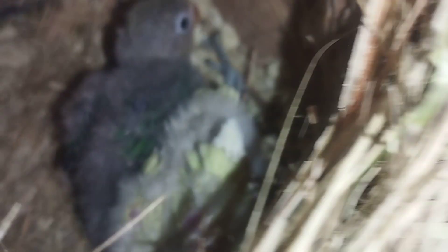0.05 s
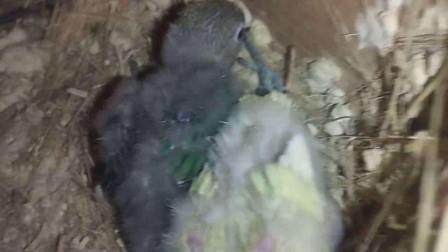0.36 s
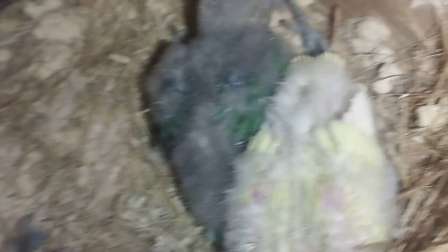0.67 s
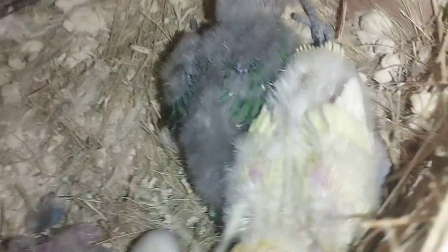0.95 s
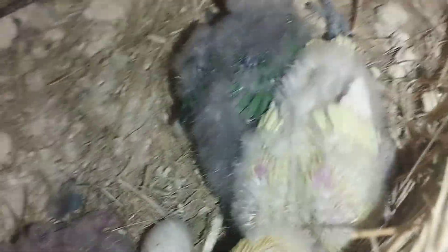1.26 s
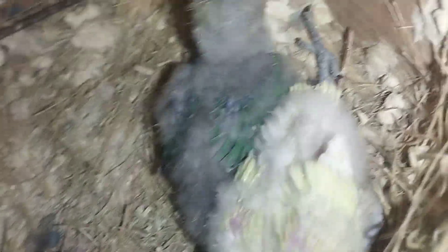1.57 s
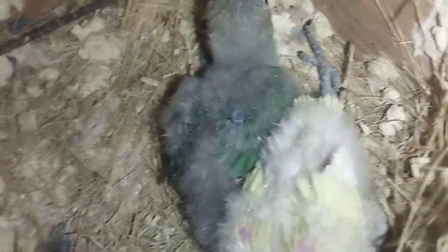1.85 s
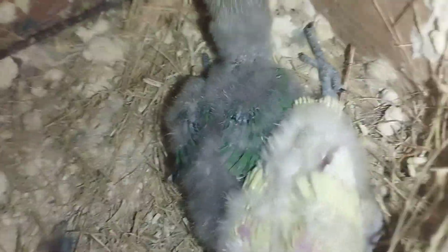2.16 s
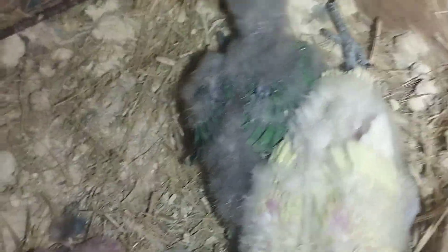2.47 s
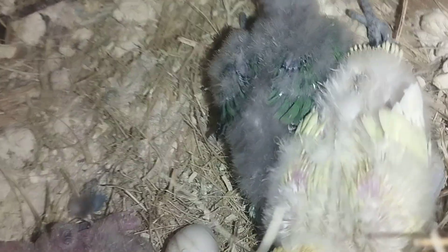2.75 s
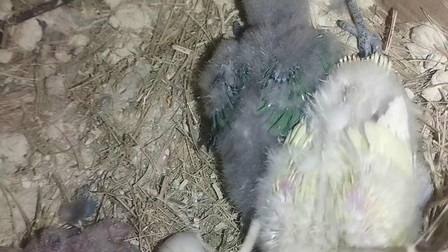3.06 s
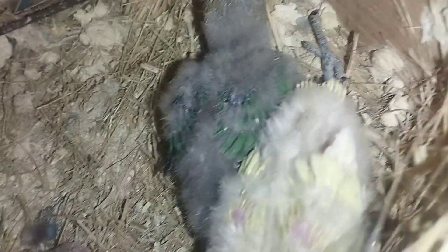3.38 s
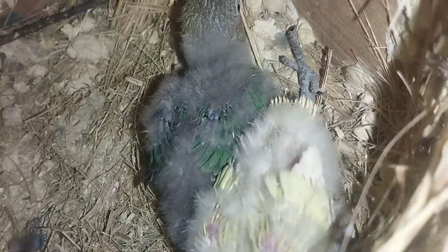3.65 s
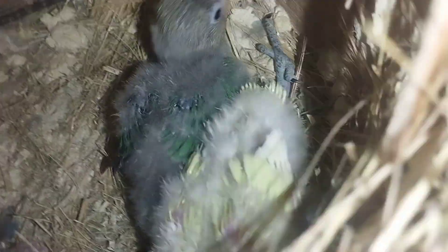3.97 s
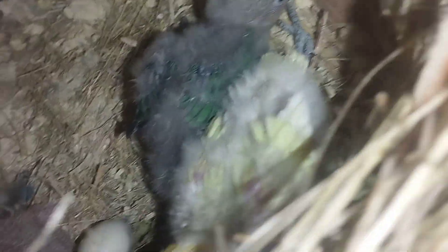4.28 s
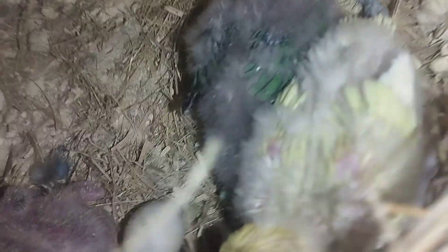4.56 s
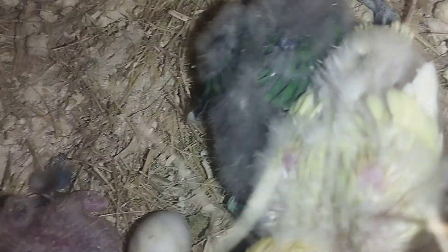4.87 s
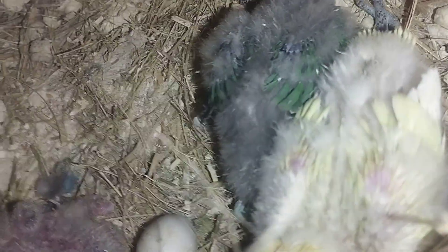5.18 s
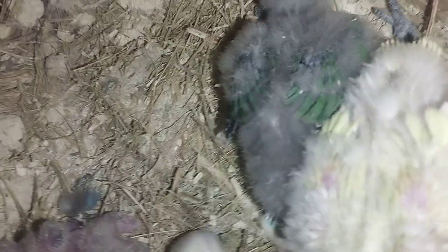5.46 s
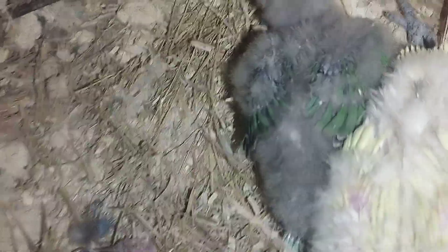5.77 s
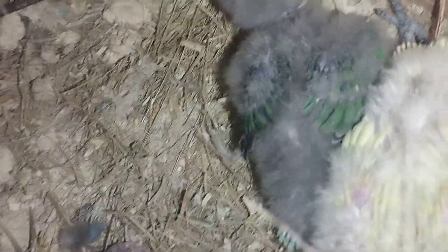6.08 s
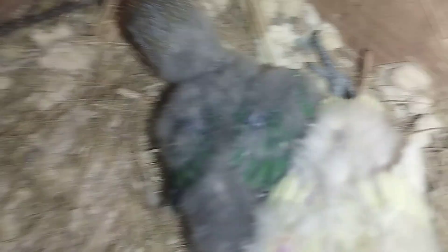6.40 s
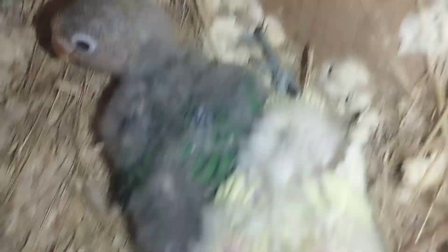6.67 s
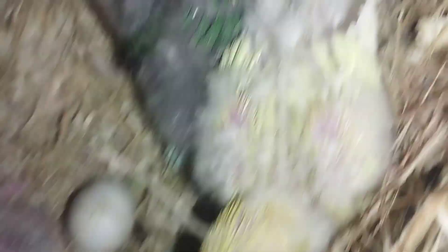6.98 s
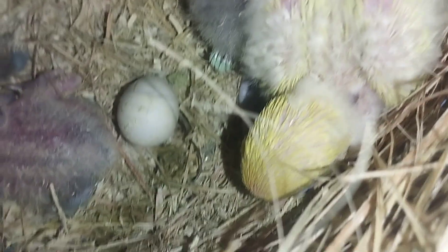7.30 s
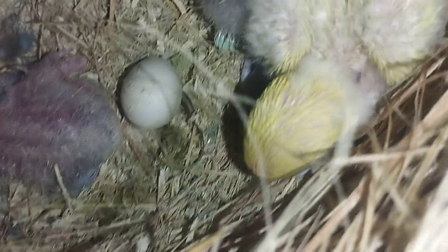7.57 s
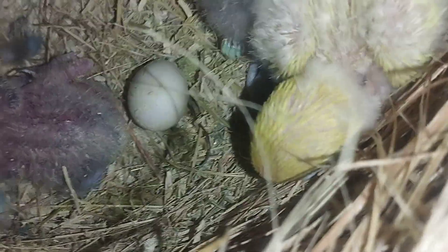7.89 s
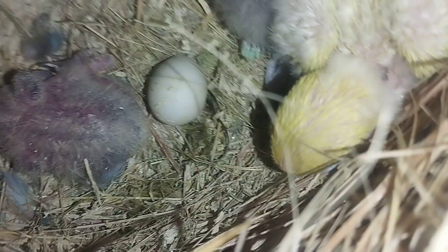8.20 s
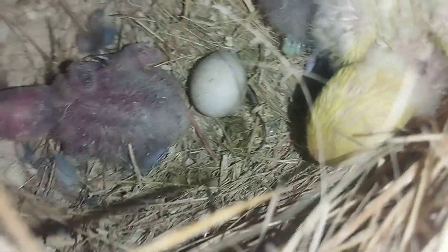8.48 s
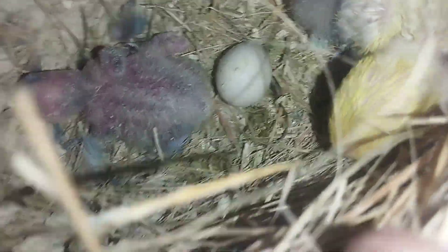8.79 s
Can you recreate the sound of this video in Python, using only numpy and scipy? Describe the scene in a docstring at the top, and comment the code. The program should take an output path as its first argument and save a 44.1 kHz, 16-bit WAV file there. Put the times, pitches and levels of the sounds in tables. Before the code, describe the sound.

Close inside a straw-lined nest box, baby parrots give scattered rasping cries and brief high squeals, with a few light knocks on the wood early on. About halfway through, a quick series of chips leads into loud, steady peeping that speeds up near the end, with more rasps mixed in. Behind them are thin whistles and twitters of distant birds, a soft rush of air and the low rumble of a hand-held microphone.

```python
"""Parrot chicks beg in a nest box, close to a hand-held camera: hoarse rasps and squeals, then a run of
chips that settles into fast, clear peeps. Each cry is a vibrating syrinx membrane; throat and beak
colour the rough ones, and the box rings briefly after all of them. Other birds twitter further off.
Underneath lie a few knocks on the straw-lined box, outside air, a low rumble and a faint hum."""
import sys
import numpy as np
from scipy import signal
from scipy.fft import rfft, irfft, next_fast_len
from scipy.io import wavfile
from scipy.ndimage import uniform_filter1d, minimum_filter1d, map_coordinates

SR = 44100
rng = np.random.default_rng(int(sys.argv[2]) if len(sys.argv) > 2 else 0)


def persist_wave(psi):
    """Save psi, clipped to +-1, as 16-bit WAV."""
    counts = np.round(np.clip(psi, -1, 1) * 32767).astype(np.int16)
    wavfile.write(sys.argv[1], SR, np.atleast_2d(counts).T)


N = 389844


# start_s, level_db, pitch_hz
PEEPS = [(5.524, -13, 4545), (5.63, -17, 4686), (5.728, -12.5, 4560), (5.833, -10, 4490),
         (5.939, -9.5, 4450), (6.047, -10.5, 4465), (6.153, -9.5, 4457), (6.263, -10.5, 4397),
         (6.371, -11, 4270), (6.594, -11.5, 4407), (6.701, -12, 4400), (6.812, -12, 4220),
         (6.921, -12, 4426), (7.034, -12.5, 4400), (7.152, -10.5, 4370), (7.267, -12.5, 4373),
         (7.383, -12, 4320), (7.496, -11, 4430), (7.591, -9.5, 4206), (7.679, -10.5, 4237),
         (7.756, -9, 4215), (7.839, -11.5, 4274), (7.921, -10.5, 4330), (8.004, -10.5, 4230),
         (8.086, -11, 4275), (8.171, -10.5, 4270), (8.258, -12, 4336), (8.345, -10.5, 4240),
         (8.436, -10.5, 4216), (8.529, -12, 4150), (8.626, -14.5, 4270), (8.724, -15, 4220),
         (8.815, -10.5, 4113)]
def peeps():
    """A peep starts about an octave low, flicks up and locks on a clear note; haste cuts the lead-in."""
    out = np.zeros((2, N))
    pauses_s = np.diff(np.array(PEEPS)[:, 0], prepend=PEEPS[0][0] - .09)
    for (start_s, db, hz), pause_s in zip(PEEPS, pauses_s):
        ease = np.clip((pause_s - .08) / .036, 0, 1)  # 0 hurried, 1 slow and brighter
        t = clock(.024 * np.exp(.13 * rng.standard_normal()))
        pitch_hz = hz * (1 + .036 * (t / t[-1] - .5))
        note = syrinx(pitch_hz, .011, 600, [0, -34, -24 + 3 * ease]) * gate(t, .009, .012)
        add(out, start_s - .002, amp(db + .5) * in_box(note, start_s, wet_db=-.5))

        t = clock(.024)
        grit = rng.standard_normal(len(t)) * amp(6.4 * wobble(506, len(t)))
        scratch = coloured(grit, THROAT) * gate(t, .00092, .043)
        add(out, start_s - .006, amp(db - 10) * in_box(scratch, start_s, wet_db=-3.5))

        t = clock((.0048 + .02 * ease) * np.exp(.15 * rng.standard_normal()))
        flick = np.exp((t - t[-1]) / .00153)
        lead = syrinx(.53 * hz * (1 + .5 * flick), .011, 1390, [2.5, 6.5, -8.5, -23, -21.5, -21])
        flutter = amp(1.84 * wobble(564, len(t)))  # unsettled membrane
        lead *= gate(t, .0047, .0035) * (1 + flick) * flutter
        lead_db = db - 22.5 + 3.5 * ease
        add(out, start_s - t[-1] + .000942, amp(lead_db) * in_box(lead, start_s, wet_db=.5))
    return out


# throat response: freq_hz, gain_db
THROAT = [(900, -74), (1750, -19), (2250, -5.5), (2900, 10.5), (3700, 12.5), (4500, 7), (5400, 2.5),
          (6300, 3), (7200, -3.5), (8400, -10.5), (9400, -8.5), (10700, -16), (12000, -5), (13400, -2.5),
          (16000, -24)]
# start_s, length_s, level_db, pitch_hz, swell_db, hiss_ratio
RASPS = [(0, 0.19, -40.5, 2306, -6, .8), (0.416, 0.16, -28.5, 2500, -2, 1.1),
         (3.073, .13, -18.5, 2660, -3, 0.16), (3.243, 0.14, -18.5, 2698, 7, .45),
         (3.452, 0.12, -19, 2399, -13, 0.43), (3.628, 0.15, -22.5, 2472, -15, 0.6),
         (3.781, .095, -19, 2557, -5, 0.62), (4.859, 0.15, -23, 2482, -3.5, 0.25),
         (5.616, 0.0505, -20, 2372, -7, 1.1), (5.708, 0.0426, -22, 2440, 4, 0.76),
         (6.416, .15, -20.5, 2550, -8, .5), (7.524, 0.12, -27.5, 2460, -3, 0.41),
         (8.505, 0.19, -28.5, 2346, 8, 0.42), (8.706, .14, -23, 2265, -14, 1)]
def rasps():
    """Pressed hard, the membrane runs chaotic: it slips around a sagging pitch in uneven spurts."""
    out = np.zeros((2, N))
    sag_ratio, beak_q = .0908, 2.05
    for start_s, length_s, db, hz, swell_db, hiss_ratio in RASPS:
        t = clock(length_s)
        progress = t / t[-1] - .5
        chaos = amp(3 * wobble(60, len(t)))
        pitch_hz = hz * (1 - sag_ratio * progress) * np.exp(.08 * chaos * wobble(380, len(t)))
        voice = unit(syrinx(pitch_hz, .06 * chaos, 1700, [-2, 0, -5, -3, -2, -4]))
        voice += hiss_ratio * chaos * rng.standard_normal(len(t))
        spurts_db = 3.8 * wobble(450, len(t)) + 1.2 * wobble(70, len(t))
        voice *= amp(spurts_db)
        voice += signal.lfilter(*signal.iirpeak(2 * hz, beak_q, SR), voice)  # beak rings at harmonic 2
        voice = coloured(voice, THROAT) * amp(db + swell_db * progress + 1.5)
        add(out, start_s, in_box(voice * gate(t, .022, .033), start_s, wet_db=-2))
    return out


# start_s, length_s, start_hz, end_hz, level_db, roughness, beak_hz
SQUEALS = [(1.655, 0.029, 2180, 3640, -21, 0.22, 2780), (2.355, 0.025, 2312, 2420, -18.5, 0.37, 4660),
           (2.44, 0.042, 3100, 3210, -23, 0.46, 3500), (2.51, 0.036, 2624, 2765, -17, 0.32, 4700),
           (2.534, 0.039, 2516, 1967, -18, 0.24, 4200), (2.577, 0.036, 2310, 2410, -22.5, 0.36, 2430),
           (2.62, 0.049, 3624, 4204, -14.5, .14, 3950), (3.041, 0.0347, 2317, 2362, -15, 0.26, 4700),
           (3.448, 0.016, 2110, 2430, -18.5, .6, 4600), (3.617, .013, 2314, 2300, -10.5, .15, 4640),
           (3.759, 0.025, 2920, 2830, -23.5, 0.36, 5850), (3.782, 0.0176, 2330, 2424, -10, 0.36, 4600),
           (4.436, 0.009, 4180, 4050, -21.5, 0.62, 4200), (4.495, .0075, 3220, 3370, -24.5, 0.6, 4300),
           (4.532, 0.068, 3726, 3444, -27, 0.24, 3740), (5.431, 0.016, 2420, 2875, -14, 0.5, 5230),
           (5.505, 0.02, 2420, 3480, -19.5, 0.6, 5800), (5.604, 0.0162, 2500, 3300, -26, 0.55, 5800),
           (5.711, 0.014, 2490, 3300, -31, 0.45, 5800), (8.511, 0.035, 2464, 2370, -25.5, .3, 4800),
           (8.682, 0.019, 2270, 2310, -23.5, .2, 4570)]
def squeals():
    """Each squeal slides straight from one pitch to another."""
    out = np.zeros((2, N))
    for start_s, length_s, start_hz, end_hz, db, roughness, beak_hz in SQUEALS:
        pitch_hz = np.linspace(start_hz, end_hz, len(clock(length_s)))
        cry = open_beak_cry(pitch_hz, roughness, beak_hz)
        add(out, start_s, amp(db) * in_box(cry, start_s, wet_db=-3))
    return out


# start_s, level_db, roughness
RISING_CHIPS = [(4.554, -25.5, 0.4), (4.608, -23.5, 0.46), (4.661, -21.5, 0.28), (4.72, -20.5, .2),
                (4.786, -19, 0.2), (4.858, -19, 0.22)]
# start_s, level_db, start_hz, roughness
FALLING_CHIPS = [(5.007, -22, 2290, 0.25), (5.084, -18, 2640, 0.16), (5.167, -19.5, 3670, 0.41),
                 (5.249, -19.5, 3710, 0.35), (5.329, -19.5, 3730, .38), (5.414, -18, 3770, 0.46)]
def chips():
    """A chip settles on its note within milliseconds, from below or above."""
    out = np.zeros((2, N))
    for start_s, db, roughness in RISING_CHIPS:
        pitch_hz = settle(start_hz=2500, end_hz=3132, tau_s=.003, length_s=.015)
        cry = open_beak_cry(pitch_hz, roughness, beak_hz=5460)
        add(out, start_s, amp(db) * in_box(cry, start_s, wet_db=-3))
    for start_s, db, start_hz, roughness in FALLING_CHIPS:
        pitch_hz = settle(start_hz, end_hz=2100, tau_s=.0055, length_s=.0262)
        cry = open_beak_cry(pitch_hz, roughness, beak_hz=6640)
        add(out, start_s, amp(db) * in_box(cry, start_s, wet_db=-3))
    return out


# open beak response: freq_hz, gain_db
BEAK = [(1500, -27), (2200, 1), (3000, 3.5), (4300, 4.5), (5300, 0.5), (6400, -3), (7700, -15.5),
        (9500, -22), (10800, -26.5), (13000, -11.5), (16000, -38)]
def open_beak_cry(pitch_hz, roughness, beak_hz):
    """Harmonics sweep through the beak resonance; roughness (0-1) adds jitter, flutter and hiss."""
    t = np.arange(len(pitch_hz)) / SR
    voice = syrinx(pitch_hz, .11 * roughness, 1485, [-1, 5, 5.5, 10.5, 12, 12.5, 19])
    voice *= amp(6 * roughness * wobble(518, len(t)))
    voice = unit(voice) + 1.3 * roughness ** 2 * rng.standard_normal(len(t))
    ring = signal.lfilter(*signal.iirpeak(beak_hz, Q=5, fs=SR), voice)
    return coloured(voice + 2.28 * ring, BEAK) * amp(2) * gate(t, .005, .004)


def syrinx(pitch_hz, jitter, jitter_rate_hz, harmonics_db):
    """Harmonics of a membrane whose pitch trembles at random."""
    hz = pitch_hz * np.exp(jitter * wobble(jitter_rate_hz, len(pitch_hz)))
    phase = 2 * np.pi * np.cumsum(hz) / SR
    return sum(amp(db) * (k * hz < SR / 2) * np.sin(k * phase) for k, db in enumerate(harmonics_db, 1))


# freq_hz, t60_s
BOX_DECAY = [(200, 0.34), (2500, 0.33), (4500, 0.28), (13000, 0.22)]
# stereo image: time_s, left_minus_right_db, phase_align_delay_s
STEREO_IMAGE = [(0, -11, 0.00022), (2.5, -3, 0.00018), (3.8, 0.5, .0002), (4.7, -10, 0.00035),
                (5.7, -4, .00043), (8.84, -7.5, 0.00042)]
def in_box(x, start_s, wet_db):
    """A cry is mostly louder on the right, its main note about in phase in both channels; walls echo it."""
    hz, t, noise = signal.stft(rng.standard_normal((2, SR // 3)), SR, nperseg=256)
    decay = amp(-60 * t / along(BOX_DECAY, hz)[:, None])
    build_up = 1 - np.exp(-t / .0014)
    tail = signal.istft(noise * decay * build_up, SR, nperseg=256)[1]
    wet = signal.fftconvolve(x[None], tail, axes=1)
    wet *= np.linalg.norm(x) / np.linalg.norm(wet, axis=1, keepdims=True)
    times_s, sides_db, align_s = np.transpose(STEREO_IMAGE)
    shift = round(abs(np.interp(start_s, times_s, align_s)) * SR)
    direct = np.zeros_like(wet)
    direct[0, shift:shift + len(x)] = x
    direct[1, :len(x)] = x
    side_db = np.interp(start_s, times_s, sides_db)
    return pan(side_db) * direct + amp(wet_db) * pan(.72 * side_db) * wet


# start_s, length_s, start_hz, end_hz, level_db
WHISTLES = [(0, .16, 4400, 4750, -39), (0.797, .1, 4700, 5060, -40), (0.91, .05, 3590, 3750, -33.5),
            (1.304, 0.088, 5460, 5170, -36.5), (1.52, 0.039, 5920, 6200, -59),
            (1.765, 0.1, 4200, 3650, -34), (2.791, 0.068, 6000, 6260, -41), (4.045, 0.058, 5060, 5170, -32),
            (4.27, .05, 6400, 6520, -38), (7.841, 0.065, 1610, 1620, -41.5)]
# flock spectrum: freq_hz, gain_db
TWITTER = [(1100, -48), (1900, -0.5), (2500, 2.5), (3300, 2.5), (4400, 6.5), (5300, 0.5), (6400, -4.5),
           (8000, -18), (10500, -22), (12800, -14), (16000, -16)]
def far_birds():
    """Thin whistles, mostly echo, over a patchy blur of many more."""
    out = np.zeros((2, N))
    for start_s, length_s, start_hz, end_hz, db in WHISTLES:
        t = clock(length_s)
        note = syrinx(np.linspace(start_hz, end_hz, len(t)), .04, 710, [0, -22]) * gate(t, .0039, .021)
        add(out, start_s, amp(db) * in_box(note, start_s, wet_db=2))
    noise = signal.stft(rng.standard_normal((2, N)), nperseg=512)[2]
    patches = uniform_filter1d(rng.standard_normal(noise.shape[1:]), size=5, axis=0)
    patches = uniform_filter1d(patches, size=16, axis=1)
    blur = signal.istft(noise * amp(4.14 * unit(patches)), nperseg=512)[1][:, :N]
    flock_db = outside_db() + 6.5 + .7 * wobble(6.6, N)
    return out + amp(flock_db) * coloured(blur, TWITTER) * pan(-6)


# start_s, level_db
KNOCKS = [(0.504, -18), (0.594, -23), (2.037, -24), (2.21, -29.5)]
# freq_hz, level_db, t60_s
WOOD_MODES = [(180, -7, 0.14), (295, 13.5, 0.015), (442, -7.5, 0.02), (650, -27, .03), (1130, -17, 0.0081)]
def knocks():
    """Knocks ring the wooden box, each with a crunch of straw."""
    out, t = np.zeros((2, N)), clock(.27)
    for start_s, db in KNOCKS:
        ring = sum(amp(mode_db + rng.normal(0, 1.5) - 60 * t / t60_s) * np.sin(2 * np.pi * hz * t)
                   for hz, mode_db, t60_s in WOOD_MODES)
        straw = 1.77 * coloured(rng.standard_normal(len(t)), AIR) * amp(-60 * t / .02)
        add(out, start_s, amp(db - 7.5) * (ring + straw))
    return out


# steady rumble spectrum: freq_hz, gain_db
RUMBLE = [(25, -10), (45, 3), (59, -1.5), (81, -11.5), (100, -9), (118, -2), (141, -9.5), (175, -2),
          (223, -5), (282, 1.5), (330, -10), (450, -18), (700, -55)]
# hand motion spectrum: freq_hz, gain_db
HAND = [(10, -25), (24, 9), (40, -4), (58, 10), (80, -4), (130, -68)]
# hand moves: centre_s, half_width_s, level_db
SWAYS = [(2.217, .12, -38), (6.78, 0.21, -39.5), (8.7, .2, -47)]
def handling_rumble():
    """Steady rumble, plus tremor and sway of the hand on the camera."""
    t = np.arange(N) / SR
    rumble_db, tremor_db = -38, -51.5
    rumble = amp(rumble_db + wobble(8.1, N)) * stereo_noise(RUMBLE, spread=.41, side_db=4)
    sway = sum(amp(db) * np.exp(-((t - centre_s) / half_s) ** 2) for centre_s, half_s, db in SWAYS)
    return rumble + (amp(tremor_db) + sway) * stereo_noise(HAND, spread=.3, side_db=0)


# air and straw spectrum: freq_hz, gain_db
AIR = [(200, -14), (350, 1), (480, -1), (700, 3.5), (1200, -4.5), (2000, -7), (4000, -28), (8000, -35),
       (15000, -49)]
def air():
    """Soft, wavering rush of outside air."""
    return amp(outside_db() + 2.5 + .87 * wobble(12, N)) * stereo_noise(AIR, spread=1, side_db=-5.5)


# time_s, level_db
OUTSIDE = [(0.0, -41), (0.49, -41), (2.31, -44), (2.51, -43.5), (3.72, -45.5), (4.18, -43), (5.37, -42),
           (5.56, -47.5), (8.84, -44)]
def outside_db():
    """Base level shared by the air and the distant flock."""
    return np.interp(np.arange(N) / SR, *np.transpose(OUTSIDE))


# freq_hz, level_db, left_minus_right_db
HUM_TONES = [(59.5, -48, 0), (101.2, -45.5, -10.5), (198.6, -49.5, -4), (286.9, -48, 17.5)]
def hum():
    """Faint low tones that waver in level and phase."""
    t = np.arange(N) / SR
    return sum(amp(db + 3.4 * wobble(4, N)) * np.sin(2 * np.pi * hz * t + .97 * wobble(7, N))
               * pan(side_db) for hz, db, side_db in HUM_TONES)


def amp(db):
    """Decibels to gain."""
    return 10 ** (np.asarray(db) / 20)


def pan(side_db):
    """Stereo gains for a left-minus-right level."""
    return amp(side_db * np.array([[.5], [-.5]]))


def unit(x):
    """Scale to rms 1."""
    return x / np.sqrt(np.mean(x ** 2) + 1e-20)


def along(points, hz):
    """Interpolate (freq_hz, value) points on a log axis."""
    freqs_hz, values = np.transpose(points)
    return np.interp(np.log(hz + 1), np.log(freqs_hz), values)


def clock(length_s):
    """Sample times in s."""
    return np.arange(max(int(length_s * SR), 64)) / SR


def settle(start_hz, end_hz, tau_s, length_s):
    """Exponential pitch glide."""
    return end_hz + (start_hz - end_hz) * np.exp(-clock(length_s) / tau_s)


def wobble(rate_hz, size):
    """Smooth random curve, rate_hz knots a second."""
    knots = rng.standard_normal(int(size * rate_hz / SR) + 4)
    return map_coordinates(knots, [np.arange(size) * rate_hz / SR])


def coloured(x, spectrum):
    """Filter by a (freq_hz, gain_db) spectrum, to rms 1."""
    n = x.shape[-1]
    padded = next_fast_len(n + 1024)
    gain = amp(along(spectrum, np.fft.rfftfreq(padded, 1 / SR)))
    return unit(irfft(rfft(x, padded) * gain, padded)[..., :n])


def stereo_noise(spectrum, spread, side_db):
    """Noise partly common to both channels."""
    noise = rng.standard_normal(N) + spread * rng.standard_normal((2, N))
    return coloured(noise * pan(side_db), spectrum)


def gate(t, rise_s, fall_s):
    """Quarter-sine fade in and out."""
    fade_in = np.sin(np.pi / 2 * np.clip(t / rise_s, 0, 1))
    return fade_in * np.sin(np.pi / 2 * np.clip((t[-1] - t) / fall_s, 0, 1))


def add(out, start_s, x):
    """Mix x into out."""
    i = min(max(int(start_s * SR), 0), N)
    out[:, i:i + x.shape[-1]] += x[..., :N - i]


def scene():
    """The chicks and their surroundings."""
    chicks = peeps() + squeals() + chips() + rasps()
    return chicks + far_birds() + handling_rumble() + air() + hum() + knocks()


# microphone port colour: freq_hz, left_minus_right_db
PORTS = [(1500, 1), (2500, -4.5), (4500, -2), (6500, -5.5), (8500, 0.5), (13000, 5)]
def record(dry):
    """Each port colours the sound; a peak limiter and a band limit follow."""
    ceiling, top_hz = .95, 16000
    hz = np.fft.rfftfreq(N, 1 / SR)
    heard = irfft(rfft(dry) * pan(along(PORTS, hz)), N)
    needed_gain = np.minimum(1, ceiling / (np.abs(heard).max(axis=0) + 1e-9))
    gain = uniform_filter1d(minimum_filter1d(needed_gain, size=160), size=80)
    return irfft(rfft(heard * gain) * (hz < top_hz), N)


dry = scene()
out = record(dry)
persist_wave(out)
```